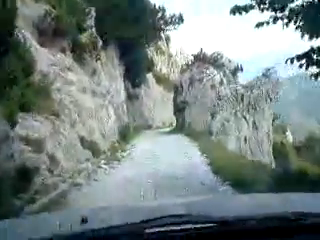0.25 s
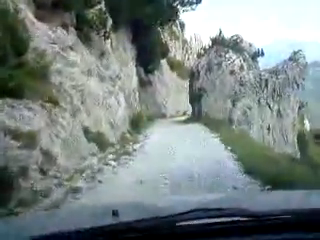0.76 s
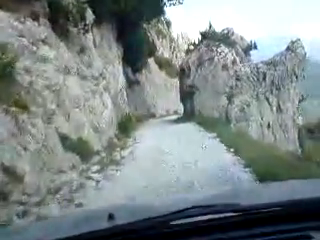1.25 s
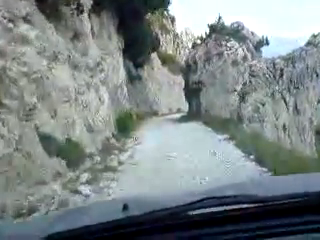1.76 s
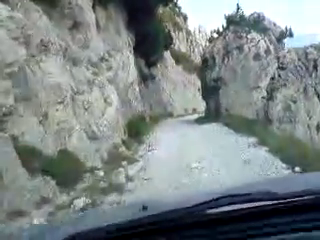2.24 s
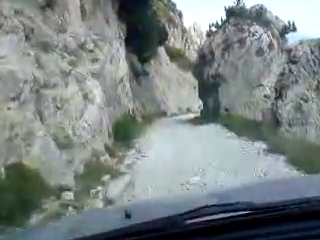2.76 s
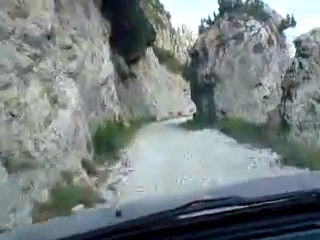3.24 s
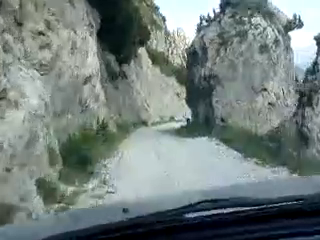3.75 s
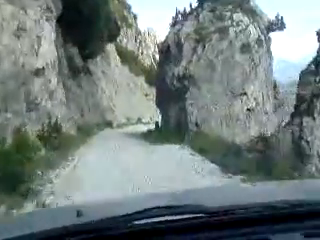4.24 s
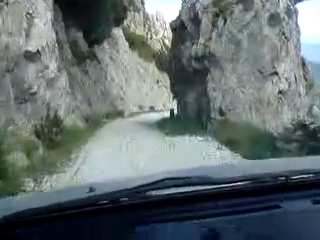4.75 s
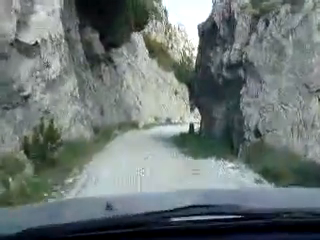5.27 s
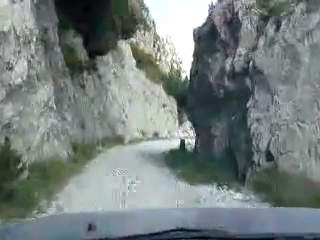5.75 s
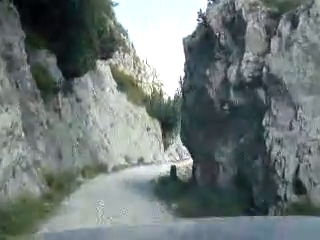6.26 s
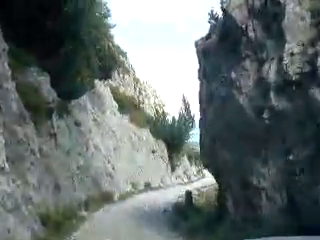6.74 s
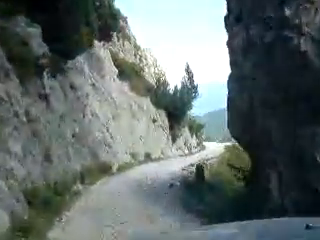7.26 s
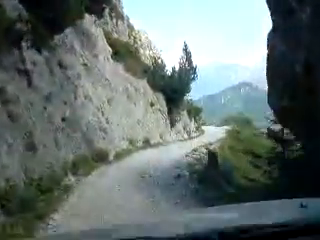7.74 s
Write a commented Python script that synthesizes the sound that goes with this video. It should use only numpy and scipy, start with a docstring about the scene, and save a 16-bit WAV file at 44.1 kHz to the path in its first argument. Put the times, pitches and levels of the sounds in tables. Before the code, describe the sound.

From the front seat of a car on a loose stone road, a deep engine drone and low boom run throughout, with faint gear whine. Tyres rumble and crunch over grit. Early on, plastic trim rattles and gives one loud sharp snap. Later, stones knock the floor, with one heavy thud midway, and the gravel spray thickens near the end.

```python
"""Inside a car on a loose gravel road: engine orders drone and gears whine on one shaft, while low noise booms.
Filtered stone contacts make the tyres rumble, churn, spray grit and crunch over stones and pebbles.
Some stones knock against the floor pan, which rings in damped modes over a noisy crack and shudder.
Loose plastic trim ticks with short modes and a scrape, once with a sharp snap.
Two faint sine tones of fixed pitch, wavering in strength, make a thin whistle."""
import sys
import numpy as np
from scipy import signal
from scipy.fft import rfft, irfft, next_fast_len
from scipy.io import wavfile
from scipy.ndimage import uniform_filter1d, map_coordinates

SR = 44100
rng = np.random.default_rng(int(sys.argv[2]) if len(sys.argv) > 2 else 0)


def output_pcm(signal):
    """Save a mono or channel-first signal as 16-bit PCM at the path in sys.argv[1].

    Samples are clipped to [-1, 1] before scaling.
    """
    pcm = np.clip(np.atleast_2d(signal).T, -1, 1) * 32767
    wavfile.write(sys.argv[1], SR, np.round(pcm).astype(np.int16))


N = 352800

# slow swells and dips of the low noise:
# (time of the middle [s], length [s], boom change [dB], rumble change [dB])
LOW_SWELLS = [(.24, 0.25, 2.5, 4.5), (.82, .3, -2.5, -0.5), (1.22, 0.3, 4, 0), (1.55, 0.21, -7, 2),
              (1.9, .1, 0, 0.5), (2.17, 0.21, 7, -5), (2.82, 0.27, -3, 5.5), (3.35, 0.4, 6.5, 2.5),
              (4.07, 0.14, 5, 4), (4.36, .22, -19, 1), (4.84, .1, -3, 4.5), (5.42, 0.49, 5, 3.5),
              (6.35, 0.4, 1.5, -1.5), (7.0, 0.24, 6.5, -2.5), (7.3, 0.12, 2, 3.5), (7.56, 0.28, 5.5, 8)]
# how loose the gravel lies, the base for grit, churn and pebbles: (time [s], level [dB])
GRAVEL = [(0.0, -50.5), (0.47, -51.5), (2.36, -53), (2.78, -51), (2.96, -53), (3.76, -52.5), (4.03, -51.5),
          (4.19, -48.5), (4.3, -50.5), (4.5, -56), (4.86, -50.5), (5.21, -47.5), (5.7, -51), (6.6, -51.5),
          (7.48, -46), (8.0, -49.5)]
# colour of fine grit: (frequency [Hz], relative level [dB])
GRIT = [(1410, -18), (2400, -5.5), (2880, -8), (3950, -7.5), (5680, -15), (6640, -18.5), (7100, -26),
        (9620, -32.5), (16300, -120)]


def amp(db):
    """Decibels to gain."""
    return 10 ** (np.asarray(db) / 20)


def unit(x):
    """Scale to rms 1."""
    return x / np.sqrt(np.mean(x ** 2) + 1e-20)


def curves(rows):
    """One value per sample for each column after the time."""
    s, *cols = np.transpose(rows)
    return [np.interp(np.arange(N) / SR, s, c) for c in cols]


def swells(rows):
    """Change in dB over time, for each column after the length: one smooth hump or dip per row."""
    t = np.arange(N) / SR
    s, length, *changes = np.transpose(rows)
    humps = np.exp(-(2 * (t - s[:, None]) / length[:, None]) ** 2)
    return np.array(changes) @ humps


def wobble(rate):
    """A smooth random curve, rate knots a second."""
    knots = rng.standard_normal(int(N * rate / SR) + 4)
    return map_coordinates(knots, [np.arange(N) * rate / SR])


def filtered(x, response):
    """x times a response of frequency."""
    size = next_fast_len(N + SR // 2)
    return irfft(rfft(x, size) * response(np.fft.rfftfreq(size, 1 / SR)), size)[:N]


def coloured(x, spectrum):
    """x shaped by (Hz, dB) points on a log axis, at rms 1."""
    f, db = np.transpose(spectrum)

    def response(hz):
        return amp(np.interp(np.log(hz + 1), np.log(f + 1), db, left=-120, right=-120))

    return unit(filtered(x, response))


def tilted(x, corner_hz, low_db):
    """x with its part below a corner made louder or softer."""
    low = signal.sosfiltfilt(signal.butter(3, corner_hz, fs=SR, output="sos"), x)
    return x + (amp(low_db) - 1) * low


def patchy(x, depth_db):
    """Stones differ in colour: random gain patches in time and frequency."""
    z = signal.stft(x, nperseg=512)[2]
    field = uniform_filter1d(rng.standard_normal(z.shape), size=5, axis=0)
    field = uniform_filter1d(field, size=7, axis=1)
    return signal.istft(z * amp(depth_db * unit(field)), nperseg=512)[1][:N]


def grains(rate, spread_db):
    """Random stone contacts, rate a second, of uneven size, at rms 1."""
    hit = rng.random(N) < rate / SR
    size_db = spread_db * np.clip(rng.standard_normal(N), -2, 2)
    return unit(hit * rng.choice([-1, 1], N) * amp(size_db))


def ring(modes, t, scatter_db):
    """Damped modes of uneven strength; neighbours start in opposite directions, so the sound swells for a few cycles."""
    out = np.zeros(len(t))
    for k, (hz, db, t60) in enumerate(modes):
        decay = amp(db + scatter_db * rng.standard_normal() - 60 * t / t60)
        out += (-1) ** k * decay * np.sin(2 * np.pi * hz * t)
    return out


def add(track, s, sound, db):
    """Place a sound at time s with the given peak level."""
    part = track[max(0, round(s * SR)):][:len(sound)]
    part += (amp(db) * sound / np.abs(sound).max())[:len(part)]


def engine():
    """Firing orders and gear mesh follow one shaft, shaken by bumps; a noisy boom swells and dips."""
    # engine speed: (time [s], firing rate [Hz])
    speed = [(0, 46.1), (0.5, 45.9), (1, 47.7), (1.5, 49.5), (2, 50.6), (2.5, 50.8), (3, 51.1), (3.7, 50.6),
             (4.1, 49.6), (4.5, 48.5), (5, 47.2), (5.5, 46.4), (6, 47.0), (6.5, 47.4), (7, 46.4),
             (7.5, 45.4), (8, 45.0)]
    # engine effort: (time [s], drone level [dB])
    effort = [(0, -17.5), (.3, -16.5), (.55, -15), (.75, -20), (1.02, -13.5), (1.27, -21.5), (1.6, -14),
              (2.2, -15.5), (3.4, -17), (4.22, -15), (4.34, -15), (4.43, -21.5), (4.52, -17.5), (4.9, -16),
              (5.55, -19), (5.9, -15.5), (6.45, -15.5), (7.3, -18), (8, -19)]
    # drone harmonics: (multiple of firing rate, relative level [dB])
    engine_orders = [(.5, -11.5), (1, -0.76), (2, -26), (3, -30), (4, -33.5)]
    # lower and upper gear whine: (multiple of firing rate)
    gear_orders = [7.64, 9.55]
    # load on the gear teeth: (time [s], lower whine level [dB], upper whine level [dB])
    whine_levels = [(0, -43.5, -54), (.5, -48, -47.5), (.72, -46, -54.5), (1.021, -39, -41.5),
                    (1.25, -53.5, -55.5), (1.55, -39, -49), (1.85, -48.5, -52), (2.25, -49.5, -69),
                    (2.63, -54, -45), (2.95, -41.5, -54), (3.2, -46, -50), (3.42, -41, -50),
                    (3.72, -45.5, -63), (3.98, -52.5, -46), (4.501, -41.5, -60.5), (5.3, -44.5, -47),
                    (5.65, -44.5, -46), (5.85, -47, -44.5), (6.15, -42.5, -50), (6.55, -47, -61),
                    (6.9, -42, -56.5), (7.3, -52.5, -49)]
    # colour of the boom: (frequency [Hz], relative level [dB])
    boom_colour = [(10, -29.5), (18, -11.5), (22, 2.5), (26, 0.5), (31, -5), (42, -12.5), (55, -5.5),
                   (63, -23.5), (90, -28)]
    boom_db = -23.5  # before its swells and dips

    firing_hz, = curves(speed)
    drone_db, = curves(effort)
    boom_change_db, _ = swells(LOW_SWELLS)
    shaft = 2 * np.pi * np.cumsum(firing_hz) / SR
    shaft += 0.053 * wobble(9)  # bumps jerk the drive line [rad]

    def tone(order, waver):
        return np.sqrt(2) * np.sin(order * shaft + 2 * np.pi * rng.random() + waver)

    flutter = unit(amp(1.4 * wobble(20)))  # bumps make the drone flutter
    drone = flutter * sum(amp(db) * tone(order, 0) for order, db in engine_orders)
    whine = np.zeros(N)
    for order, db in zip(gear_orders, curves(whine_levels)):
        tooth_load = unit(amp(2.7 * wobble(28) + 2 * wobble(7)))  # the load flutters
        backlash = 0.55 * wobble(16)  # wavers the pitch [rad]
        whine += amp(db) * tooth_load * tone(order, backlash)
    boom = coloured(rng.standard_normal(N), boom_colour)
    return amp(drone_db) * drone + whine + amp(boom_db + boom_change_db) * boom


def tyres():
    """Rolling contacts make a rumble that swells and dips; loose gravel brings more churning stones and fine grit."""
    # colours of rolling rumble and of churning stones: (frequency [Hz], relative level [dB])
    rumble_colour = [(34, -31), (58, -3.5), (66, -7.5), (80, -7), (108, -13), (263, -26), (328, -26),
                     (368, -36.5), (413, -32), (480, -37), (620, -57), (1060, -120)]
    churn_colour = [(240, -26), (400, 3.5), (417, -13), (464, 0.5), (521, -3.5), (642, -2), (727, -5.5),
                    (843, -2.5), (909, -7), (1110, -8.5), (1960, -9), (2900, -26), (3770, -45.5),
                    (6380, -120)]
    # a tyre throws up loose gravel: (time at its height [s], length [s], churn rise [dB], grit change [dB])
    sprays = [(4.17, 0.15, 0, 2), (5.07, 0.074, 1, 3), (5.18, 0.07, 1.5, -2), (5.42, 0.52, 1, 1),
              (6.29, 0.13, 0, 7.5), (7.31, 0.18, 0, 0), (7.48, 0.095, 4.5, 3.5), (7.6, 0.12, 3.5, 1.5),
              (7.99, 0.18, 5, 1.5)]
    rumble_db, churn_base_db = -30.5, -42.5  # before swells and dips; on average gravel
    grit_over_gravel_db = 0.45
    churn_grows = 0.6  # churn dB per dB of gravel level

    gravel_db, = curves(GRAVEL)
    _, rumble_change_db = swells(LOW_SWELLS)
    spray_churn_db, spray_grit_db = swells(sprays)
    bumps = wobble(22)  # the uneven road presses on all the stones at once
    clumps = wobble(15)  # the coarse stones lie in heaps

    rumble = coloured(grains(1500, spread_db=2.0), rumble_colour)
    rumble *= amp(rumble_db + rumble_change_db + 1.6 * wobble(18))
    churn_db = churn_base_db + churn_grows * (gravel_db - gravel_db.mean()) + spray_churn_db
    churn = coloured(patchy(grains(2500, spread_db=4), depth_db=1.5), churn_colour)
    churn *= amp(churn_db + 0.55 * bumps + 0.31 * clumps)
    grit_db = grit_over_gravel_db + gravel_db + spray_grit_db
    grit = coloured(patchy(grains(5000, spread_db=0.5), depth_db=2.0), GRIT)
    grit *= amp(grit_db + 0.81 * bumps)
    return rumble + churn + grit


def whistle():
    """Faint high sine tones of fixed pitch that waver in strength."""
    # thin wavering whistle: (frequency [Hz], middle level [dB])
    whistle_lines = [(3852, -68), (3950, -69.5)]
    t = np.arange(N) / SR
    out = np.zeros(N)
    for hz, db in whistle_lines:
        out += amp(db + 1.0 * wobble(13)) * np.sqrt(2) * np.sin(2 * np.pi * hz * t)
    return out


def pebbles():
    """Small stones crunch at random, each burst of contacts resonating at its own pitch, louder on loose gravel."""
    rate, over_gravel_db, spread_db = 15, 11.5, 0.5  # stones a second; peak over the gravel level
    middle_hz, pitch_spread, pitch_q = 1420, 0.49, 3.5
    out, t = np.zeros(N), np.arange(SR // 20) / SR
    gravel_db, = curves(GRAVEL)
    contacts = grains(2500, spread_db=2)
    swell = (1 - np.exp(-t / 0.003)) * np.exp(-(t / 0.0086) ** 2)
    for place, pitch, size in rng.random((int(rate * N / SR), 3)):
        start = int(place * (N - len(t)))
        hz = middle_hz * np.exp(2 * pitch_spread * (2 * pitch - 1))
        burst = contacts[start:start + len(t)] * swell
        stone = signal.lfilter(*signal.iirpeak(hz, pitch_q, fs=SR), burst)
        add(out, start / SR, stone, gravel_db[start] + over_gravel_db + spread_db * (2 * size - 1))
    return out


def trim():
    """Plastic edges catch and slip: a dry scrape and a short ring, with each tick pitched by the spot that touches."""
    # light touches: (time [s], peak level [dB], gain of the part below 3300 Hz [dB])
    ticks = [(0.0394, -22, -8), (0.0474, -26.5, -8), (0.061, -31, -9.5), (0.078, -31, -13),
             (0.085, -23, -17), (0.148, -28, 2), (0.671, -25, 5), (0.6745, -18, 0), (0.68, -23, 3),
             (0.6832, -14.5, -10), (0.6885, -11.5, -6), (0.6908, -14, -4), (0.7025, -24, -4),
             (0.7068, -27, -4), (0.71, -20, 6), (0.864, -27.5, 3), (2.138, -30.5, 3), (2.602, -31, -1),
             (2.814, -33, -10), (3.2214, -26.5, -4), (3.236, -30, -3), (3.2663, -18.5, -1),
             (7.2926, -24.5, -26)]
    # the trim catches hard and rebounds: (time [s], peak level [dB])
    snaps = [(0.6935, -1), (0.6957, -25)]
    # modes of the plastic at its middle spot: (frequency [Hz], relative level [dB], t60 [s])
    trim_modes = [(1700, -7, 0.0087), (2320, 1, 0.006), (2900, -8, 0.0094), (3810, -4, 0.006),
                  (4260, -12, 0.0075), (5000, -18.5, .013), (5740, -15.5, 0.017), (6200, -19, 0.017),
                  (6640, -24.5, 0.0083)]
    # modes of the panel behind, shaken only by a hard snap: (frequency [Hz], relative level [dB], t60 [s])
    panel_modes = [(760, -10, 0.01), (1120, -18, 0.0084)]

    out, t = np.zeros(N), np.arange(SR // 25) / SR
    stiff = signal.butter(3, [1200, 7000], "bandpass", fs=SR, output="sos")

    def scrape(t60):
        return unit(signal.sosfilt(stiff, rng.standard_normal(len(t)))) * amp(-60 * t / t60)

    rise = 1 - np.exp(-t / 0.0007)
    for s, db, low_db in ticks:
        spot = np.exp(0.04 * rng.standard_normal())  # scales pitch and speed of decay
        tick = ring(trim_modes, spot * t, scatter_db=4.5) + amp(-4) * scrape(t60=0.015)
        add(out, s, tilted(tick * rise, corner_hz=3300, low_db=low_db), db)

    thin = signal.butter(2, 550, "highpass", fs=SR, output="sos")  # a small panel radiates little bass
    for s, db in snaps:
        snap = ring(panel_modes + trim_modes, t, scatter_db=0) + 0.12 * scrape(t60=0.018)
        add(out, s, signal.sosfilt(thin, snap), db)
    return out


def floor_pan():
    """Stones excite pan modes, a crack and a ragged shudder; heavy ones land more softly, each spot has its own pitch."""
    # knocks: (time [s], level before bounce offsets [dB], clang and crack gain [dB], pitch of the spot [Hz])
    knocks = [(1.116, -27, -8, 460), (1.142, -27, 3, 440), (1.422, -23, -12, 310), (1.568, -23, 8, 388),
              (1.925, -26, 2, 670), (2.366, -31.5, 9, 1010), (2.631, -29, 1, 640), (2.648, -26, 3, 490),
              (2.82, -25, -6, 840), (3.213, -25, -1, 484), (3.322, -26.5, 7, 850), (3.453, -25.5, 11, 385),
              (3.97, -24, -11, 487), (4.329, -6.5, -25, 415), (4.742, -26.5, -1, 370), (4.835, -27, 2, 850),
              (5.237, -20.5, -2.5, 388), (5.256, -30.5, 0, 840), (5.338, -28, -16, 415),
              (5.807, -26, -4.5, 790), (5.91, -24.5, -2, 546), (6.056, -16, -19, 500),
              (6.228, -26, -3.5, 635), (6.301, -24, -5, 480), (6.324, -21.5, -8, 483),
              (6.726, -27, -2, 380), (6.93, -26, -2, 660), (7.293, -23.5, -3, 566),
              (7.349, -24.5, -11, 415), (7.43, -25.5, -6, 550), (7.491, -20.5, -14, 360),
              (7.561, -18.5, -6, 432)]
    # pan modes before each spot shifts them: (frequency [Hz], relative level [dB], t60 [s])
    pan_modes = [(142, -15.5, 0.23), (218, -13, 0.52), (275, -12.5, 0.083), (338, -3, 0.058),
                 (406, -1, 0.046), (478, 1, 0.06), (557, -5, 0.065), (652, -2.5, 0.06), (846, -6, 0.081),
                 (1000, -12, 0.021), (1370, -13.5, 0.037)]
    # a stone grazes, lands and bounces: (delay [s], relative level [dB])
    bounces = [(-.005, -12), (0, -1.5), (.016, -14)]
    contact_s, contact_grows = 0.0063, 0.66  # at 0 dB; heavier stones press longer (dB per dB)
    clang_spread = 0.048  # pitch spread of the clanging modes from spot to spot
    spot_db, spot_octaves = 3, 0.23  # modes near the spot's pitch ring louder: how much, how near

    out, t = np.zeros(N), np.arange(SR // 4) / SR
    crack = coloured(rng.standard_normal(N), [(500, -14.5), (900, -2), (1800, -3), (3500, -18.5)])
    shudder = coloured(rng.standard_normal(N), [(110, -2), (250, 2), (480, -2), (800, -15.5)])
    for s, db, clang_db, spot_hz in knocks:
        spot = np.exp(clang_spread * rng.standard_normal())
        modes = []
        for hz, level, t60 in pan_modes:
            if 620 < hz < 1100:  # the clanging modes
                hz, level = hz * spot, level + clang_db + 7
            nearness = np.exp(-(np.log2(hz / spot_hz) / spot_octaves) ** 2)
            modes.append((hz, level + spot_db * nearness, t60))
        attack = 1 - np.exp(-(t / (contact_s * amp(contact_grows * db))) ** 2)
        for delay, blow_db in bounces:
            now = round((s + delay) * SR) + np.arange(len(t))
            noise = crack[now] * amp(-6.5 + clang_db - 60 * t / 0.05)  # t60 0.05 s
            noise += shudder[now] * amp(-9 - 60 * t / 0.18)  # t60 0.18 s
            blow = (ring(modes, t, scatter_db=0.5) + noise) * attack
            add(out, s + delay, blow, db + blow_db)
    return out


def crunches():
    """A stone gives way under a tyre: a short burst of contacts resonates at its own pitch and sprays grit."""
    # grinding stones: (time [s], decay time [s], peak level [dB], grit level relative to it [dB], pitch [Hz])
    crunch_events = [(1.736, 0.045, -30.5, -21, 1550), (2.316, 0.069, -30, -10, 1000),
                     (2.533, 0.03, -34, -19, 1450), (2.717, 0.02, -24, -20, 1820),
                     (2.733, 0.038, -25, -20, 1650), (2.804, 0.04, -30, -0.5, 1000),
                     (2.999, 0.039, -35, -3, 2040), (3.214, .035, -28.5, -5.5, 990),
                     (3.322, 0.023, -31, -8, 1750), (3.99, 0.021, -33, -2, 900),
                     (4.243, .02, -36.5, 1, 1500), (4.333, 0.018, -24.5, -19, 1390),
                     (4.473, 0.049, -38.5, .5, 1170), (4.547, 0.042, -33, -5, 1440),
                     (4.828, 0.021, -29.5, -19, 1240), (5.004, .035, -32.5, -8, 1500),
                     (5.127, 0.023, -30, -8, 900), (5.164, 0.048, -28.5, -8, 1900),
                     (5.889, 0.058, -34, 1.5, 1900), (5.979, 0.037, -43, 8.5, 1050),
                     (6.737, 0.071, -34, -21, 950), (7.05, 0.037, -24.5, -34, 1850),
                     (7.571, 0.028, -24.5, -3.5, 890), (7.738, 0.022, -27, -7.5, 3600)]
    out, t = np.zeros(N), np.arange(SR // 6) / SR
    contact_colour = [(400, 3.5), (800, -10.5), (2300, -17.0), (4000, -21.0)]
    contacts = coloured(grains(2500, spread_db=9), contact_colour)
    grit = coloured(grains(4500, spread_db=0.5), GRIT)
    for s, length, db, grit_db, hz in crunch_events:
        swell = (1 - np.exp(-t / 0.004)) * np.exp(-(t / length) ** 2)
        now = slice(round(s * SR), round(s * SR) + len(t))
        stone = signal.lfilter(*signal.iirpeak(hz, 4.2, fs=SR), contacts[now])
        add(out, s, stone * swell[:len(stone)], db)
        add(out, s, grit[now] * swell[:len(stone)], db + grit_db)
    return out


def scene():
    """The sum of all sources, as heard from the front seat."""
    return (engine() + tyres() + whistle() + pebbles() + trim() + floor_pan() + crunches())[None]


def record(dry):
    """Soft saturation rounds off the highest peaks, and a steep low-pass ends the treble."""
    top_hz = 7150
    rounded = dry[0] / (1 + np.abs(dry[0] / 0.8) ** 8) ** (1 / 8)
    return filtered(rounded, lambda hz: 1 / np.sqrt(1 + (hz / top_hz) ** 90))[None]


dry = scene()
out = record(dry)
output_pcm(out)
```